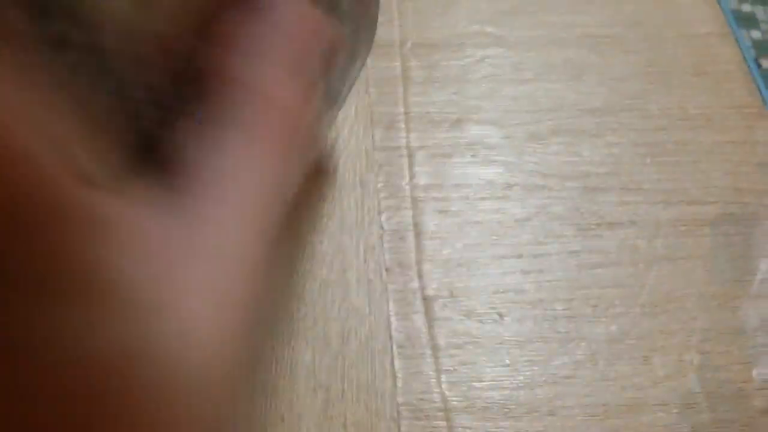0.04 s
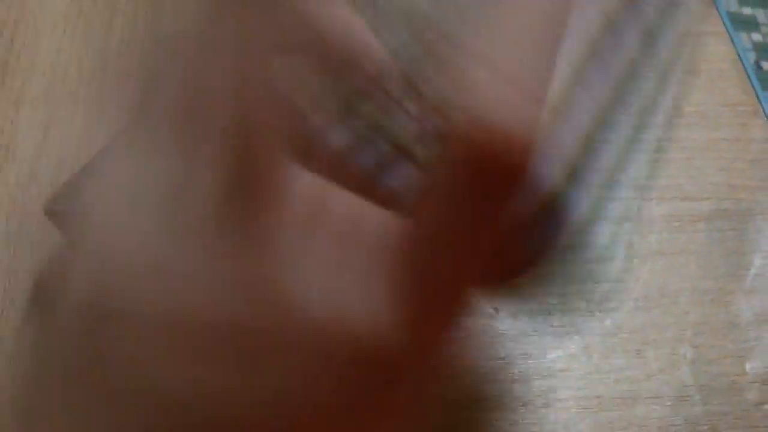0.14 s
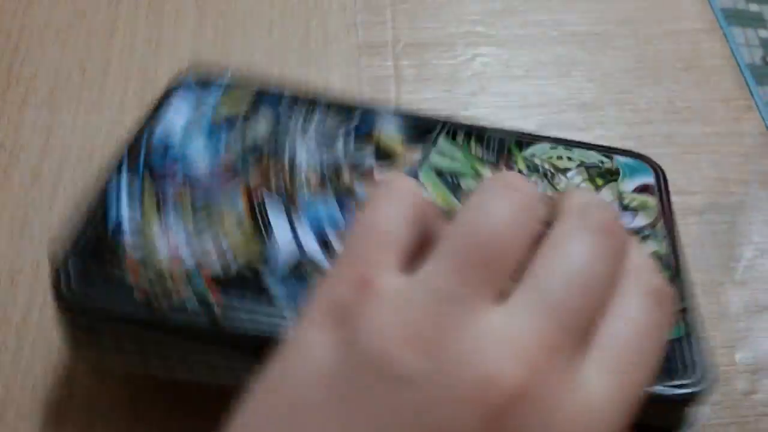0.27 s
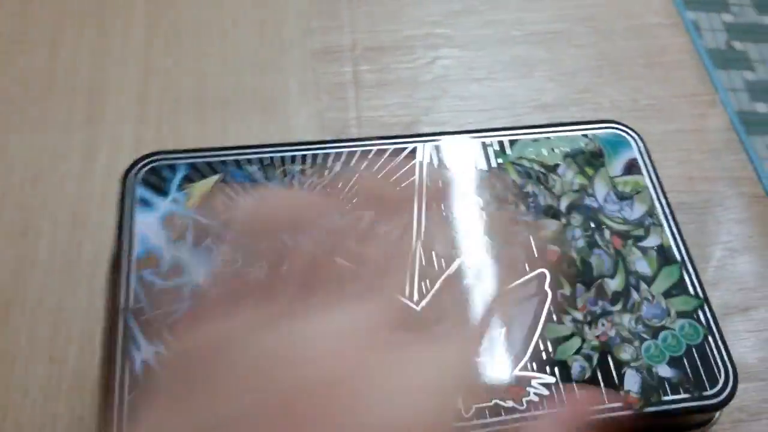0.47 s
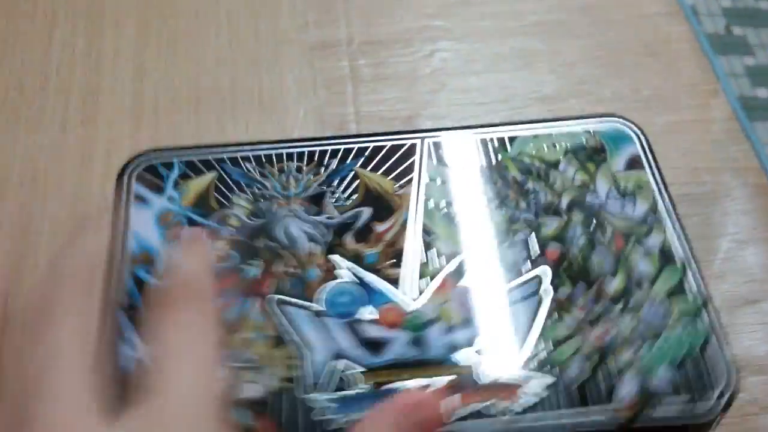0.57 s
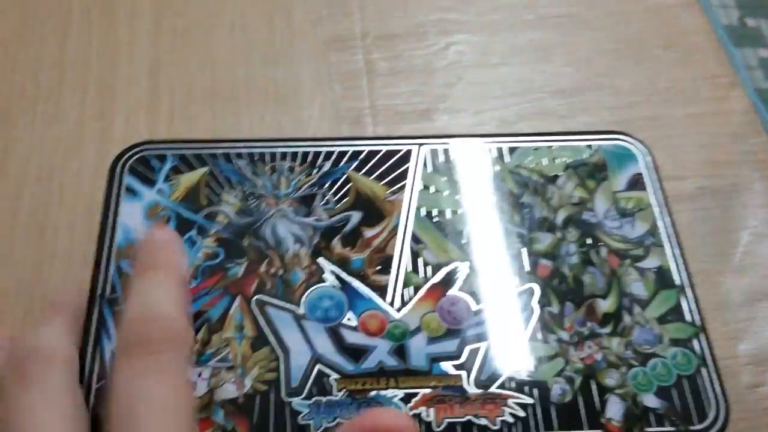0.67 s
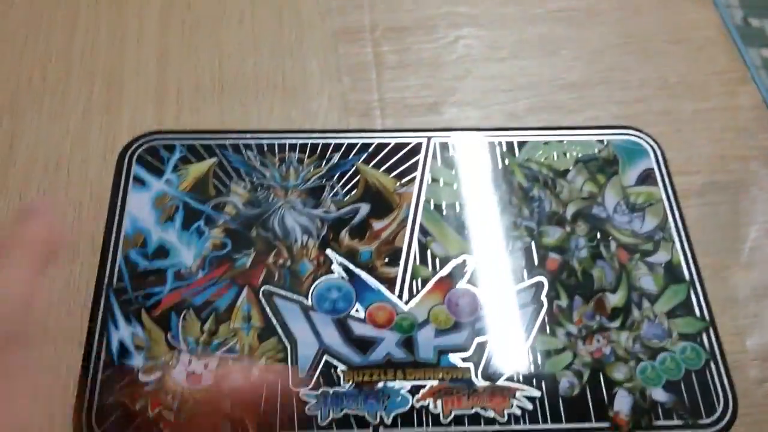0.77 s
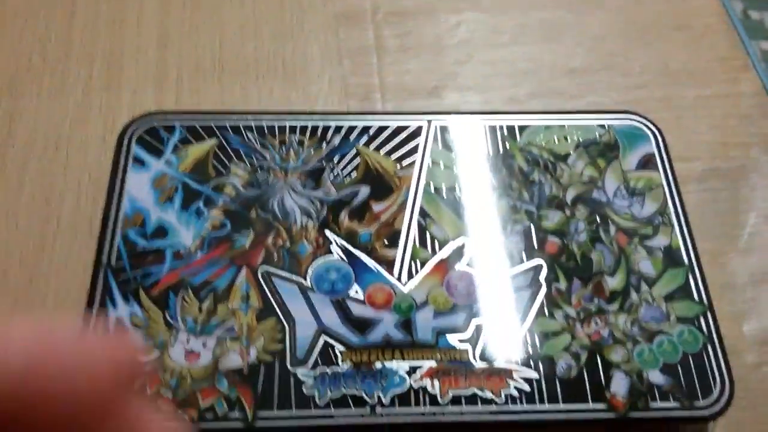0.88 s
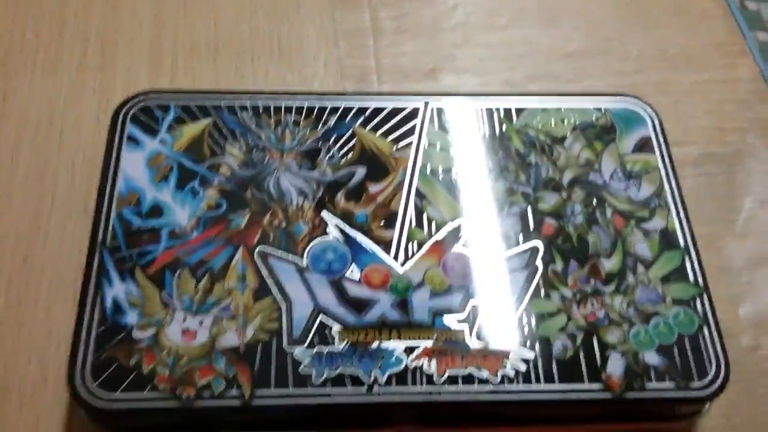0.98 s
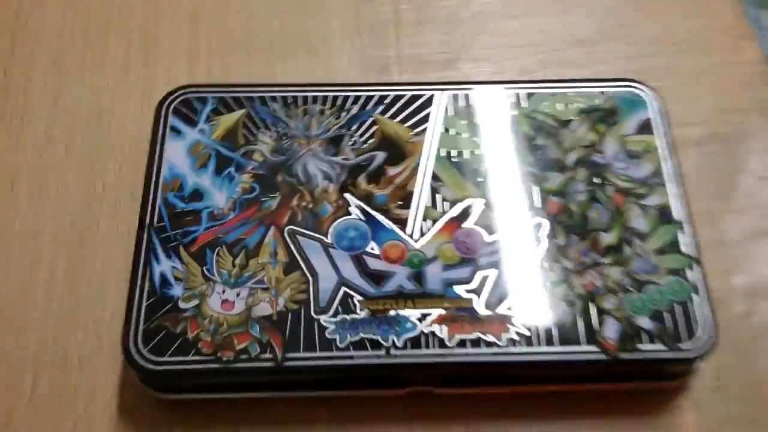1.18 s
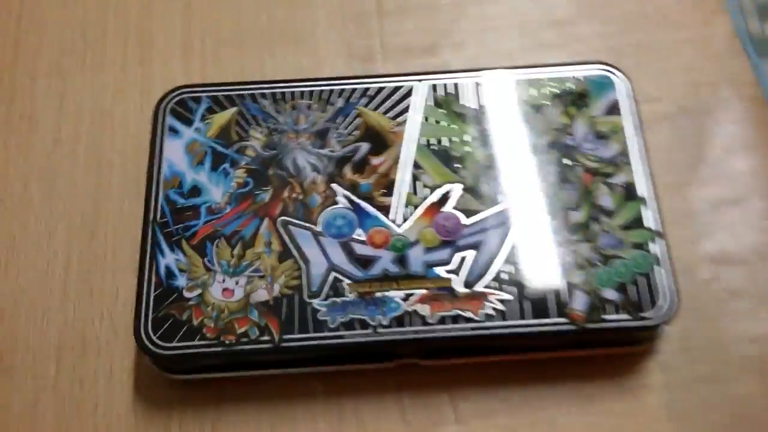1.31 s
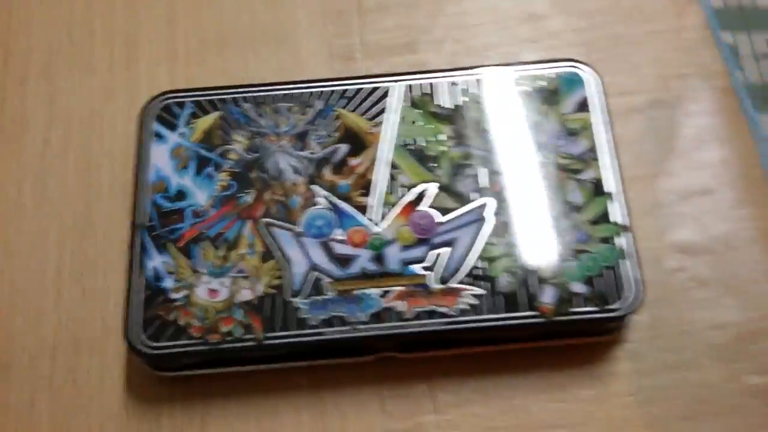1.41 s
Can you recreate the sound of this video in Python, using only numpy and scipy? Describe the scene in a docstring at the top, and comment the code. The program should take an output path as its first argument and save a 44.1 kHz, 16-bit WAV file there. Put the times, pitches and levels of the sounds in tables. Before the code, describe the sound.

A tin case is put down on a wooden table, close by in a small room. Two hollow knocks come at about 0.2 and 0.3 seconds, then two bright, clattering slaps at 0.4 and 0.5 seconds, the lid rattling and the metal ringing briefly. Fingers faintly brush the lid at 0.7 seconds. Soft, low handling bumps continue over quiet room noise until 1.45 seconds, with tiny ticks around 1.15.

```python
"""A tin case is put down on a wooden table, heard close by on one microphone in a small room.
Its corner and edge land with two hollow knocks, then it falls flat in two bright clattering slaps
as the lid rattles; each contact rings the panels, the sheet metal and, briefly, the microphone port.
Fingers brush off the lid; soft handling bumps and a few ticks sit over quiet room noise."""
import sys
import numpy as np
from scipy import signal
from scipy.fft import irfft
from scipy.io import wavfile

SR = 44100
rng = np.random.default_rng(int(sys.argv[2]) if len(sys.argv) > 2 else 0)


def to_wav(s):
    """Save 16-bit WAV."""
    ch = np.atleast_2d(s).T  # columns
    pcm = np.round(np.clip(ch, -1, 1) * 32767)  # PCM
    wavfile.write(sys.argv[1], SR, pcm.astype(np.int16))


N = 63945


def amp(db):
    """Decibels to gain."""
    return 10 ** (np.asarray(db) / 20)


def curve_at(points, hz):
    """Reads a curve on a log-frequency axis."""
    points_hz, values = np.transpose(points)
    return np.interp(np.log(hz + 1), np.log(points_hz + 1), values)


def add(mix, start_s, sound):
    """Mixes a sound in at its start time."""
    part = mix[round(start_s * SR):][:len(sound)]
    part += sound[:len(part)]


def noise(colour, size):
    """Noise of rms 1 with a given spectral shape."""
    hz = np.fft.rfftfreq(size, 1 / SR)
    phases = np.exp(2j * np.pi * rng.random(len(hz)))
    x = irfft(amp(curve_at(colour, hz)) * phases, size)
    return x / np.std(x)


def tint(x, colour, size=4096):
    """Minimum-phase filter with a given gain curve."""
    hz = abs(np.fft.fftfreq(size, 1 / SR))
    log_gain = np.log(amp(curve_at(colour, hz)))
    response = np.exp(np.conj(signal.hilbert(log_gain)))
    taps = np.fft.ifft(response).real[:size // 2]
    return signal.fftconvolve(x, taps)[:len(x)]


def swell(u):
    """Rises to 1 at u = 1, then dies away."""
    return u * np.exp(1 - u)


# Spectrum of the room tone: frequency_hz, relative_db
ROOM_TONE_COLOUR = [(20, -33.5), (32, -20.5), (48, -0.5), (72, 9), (110, -10), (180, -11), (330, -11),
                    (600, -17), (1200, -21.5), (2200, -29.5), (4000, -39.5), (5200, -38.5), (6100, -31),
                    (7500, -47), (15500, -44.5)]
# Its level at the microphone: time_s, level_db
ROOM_TONE_LEVELS = [(0, -45), (0.199, -50.5), (0.701, -47.5), (0.899, -54.5), (1.45, -53.5)]
def room_tone():
    """Quiet rumble and hiss of the room, drifting in level."""
    level_db = np.interp(np.arange(N) / SR, *np.transpose(ROOM_TONE_LEVELS))
    return amp(level_db) * noise(ROOM_TONE_COLOUR, N)


# Soft handling of the microphone: peak_s, level_db, pitch_hz, width_s
BUMPS = [(.01, -48, 70, 0.0048), (0.195, -42, 80, 0.0055), (.213, -29.5, 126, 0.0092),
         (0.245, -28, 76, 0.0087), (0.31, -32.5, 72, .012), (0.365, -22, 91, 0.0023),
         (.415, -39, 56.5, 0.032), (0.55, -39.5, 71, 0.033), (0.613, -24.5, 112, 0.0058),
         (0.682, -33.5, 127, 0.004), (0.734, -34, 80, 0.0054), (0.817, -43.5, 127.5, 0.012),
         (0.869, -36.5, 94.2, 0.0065), (.964, -38, 150.3, .0035), (1.017, -38, 110, 0.0065),
         (1.138, -42.5, 130.6, 0.0083), (1.154, -39.5, 84.9, 0.011), (1.1783, -25, 167.6, 0.0018),
         (1.185, -33, 110, .008), (1.24, -36, 203, 0.0033), (1.252, -39, 150.8, 0.0067),
         (1.283, -36.5, 129, 0.0044), (1.315, -39.5, 85, 0.024), (1.354, -39.5, 99.9, 0.0092),
         (1.432, -30, 120, 0.0028), (1.445, -38.5, 85, 0.011)]
def handling_bump(peak_s, level_db, pitch_hz, width_s):
    """Handling gives a dull, low push that swells and dies away."""
    t = np.arange(N) / SR - peak_s
    envelope = np.exp(1 - np.hypot(1, 2 * t / width_s))
    return amp(level_db) * envelope * np.cos(2 * np.pi * pitch_hz * t)


# Spectrum of the clatter's crowded, short-lived resonances: frequency_hz, relative_db
TIN_COLOUR = [(40, -27), (100, -9), (190, -10.5), (340, 0.5), (600, -4), (750, -6), (1150, -0.5),
              (1650, -8.5), (2250, -6.5), (3000, -14), (4500, -19), (5500, -11.5), (6250, -9.5),
              (6900, -17.5), (8500, -26), (15500, -32)]
def tin_strike(t, contact_db, contact_hz):
    """Each contact gives a push and a crack, and sets off a brief shrill ring in the microphone port."""
    push_rise_cycles, mic_ring_hz, mic_ring_rise_s = 0.45, 6080, 0.0008
    crack_t60_s, sheet_t60_s, sheet_rise_s = 0.0045, 0.057, 0.0012
    push = -amp(-6) * swell(t * contact_hz / push_rise_cycles) * np.sin(2 * np.pi * contact_hz * t)
    mic_ring = amp(-18) * swell(t / mic_ring_rise_s) * np.sin(2 * np.pi * mic_ring_hz * t)
    crack = amp(-13 - 60 * t / crack_t60_s) * noise(TIN_COLOUR, len(t))
    sheet_envelope = amp(-4.5 - 60 * t / sheet_t60_s) * (1 - np.exp(-t / sheet_rise_s))
    sheet = sheet_envelope * noise(TIN_COLOUR, len(t))  # the thin metal rings on after the crack
    return amp(contact_db) * (push + mic_ring + crack) + sheet


# Parts of the case that land, in the order of the level columns below
SPOTS = ["corner", "edge", "rim", "face"]
# Panel modes of the case: pitch_hz, t60_s, corner_db, edge_db, rim_db, face_db
PANEL_MODES = [(233.3, 0.23, -22, -22.5, -13, -12.5), (307.6, 0.16, -24, -15.5, -16, -8.5),
               (353.6, .13, -27.5, -12.5, -4, -8.5), (401, 0.057, 1, -10, -7, -13.5),
               (469.3, 0.14, -19.5, -1, -5.5, -8), (493.4, 0.15, 1, -10, -9.5, -4.5),
               (548, 0.095, -26.5, -21, -13, -5), (639, 0.18, -25, -24, -15, -8),
               (694.4, .25, -25, -16, -15, -17.5), (877.4, .2, -17, -15, -11.5, -22),
               (941, 0.32, -22.5, -23, -10.5, -21), (1051, 0.3, -24, -18, -18.5, -9.5),
               (1168, .1, -23, -26.5, -10, -9.5), (1228, 0.1, -15, -5, -13.5, -11.5),
               (1280, 0.31, -28.5, -27, -14, -18.5), (1449, .25, -30.5, -27, -17, -24),
               (1663, .17, -31.5, -28.5, -22, -17.5), (1914, 0.26, -34.5, -27.5, -6, -24.5),
               (2175, 0.072, -19.5, -18.5, -23.5, -3.5), (2510, .17, -21.5, -23.5, -24, -19.5),
               (6030, 0.33, -32.5, -26.5, -20.5, -24)]
def panel_ring(t, spot, rise_s=0.0027):
    """The panels ring in decaying modes; the spot that lands sets how strongly each one sounds."""
    ring = np.zeros(len(t))
    for k, (pitch_hz, t60_s, *spot_db) in enumerate(PANEL_MODES):
        envelope = amp(spot_db[SPOTS.index(spot)] - 60 * t / t60_s)
        ring += (-1) ** k * envelope * np.sin(2 * np.pi * pitch_hz * t)
    return ring * (1 - np.exp(-t / rise_s))


# Decay of the small room: frequency_hz, t60_s
ROOM_DECAY = [(100, 0.58), (400, 0.3946), (1200, 0.22), (3000, 0.2991), (6200, 0.2767), (14000, 0.302)]
# Colour of its reflections at the microphone: frequency_hz, gain_db
ROOM_COLOUR = [(100, -1.3), (400, -0.91), (1200, -1), (3000, 0), (6200, 0), (14000, 0.91)]
def room_tail(t, rise_s=0.025):
    """The room scatters the clatter, each band dying at its own speed."""
    hz, frame_s, bands = signal.stft(noise(TIN_COLOUR, len(t)), SR, nperseg=512)
    decay_db = 60 * frame_s / curve_at(ROOM_DECAY, hz)[:, None]
    bands = bands * amp(curve_at(ROOM_COLOUR, hz)[:, None] - decay_db)
    tail = signal.istft(bands, SR)[1][:len(t)]
    return amp(-12) * (1 - np.exp(-t / rise_s)) * tail


# Bands of a knock (thud, two held flat, clang, clank, shrill, sizzle): frequency_hz
KNOCK_BANDS_HZ = [100, 300, 560, 1150, 2300, 5800, 10000]
# The case landing on the table, near the microphone: start_s, spot, level_db, contact_db, contact_hz,
# thud_db, clang_db, clank_db, shrill_db, sizzle_db, panels_db, room_db (all levels are relative)
KNOCKS = [(.2051, "corner", -16, 2, 560, 5, -2, -5.5, -8, -12.5, 10, -2),
          (.2786, "edge", -9.5, -1.5, 889, -10.5, -5.5, 0, -16.5, -12.5, 10.5, -5.5),
          (0.2801, "edge", -9, 10, 403, -7, -14.5, -6.5, -10, -5, -14, -3),
          (0.3572, "rim", -13, 12.5, 1025, 7, 8.5, 10.5, 9.5, 11, 3.5, 2),
          (0.3594, "rim", -24, 15.5, 480, 3.5, -1.5, -2, 17.5, 14.5, -5.5, 2),
          (.3695, "rim", -22, -8.5, 795, -6, -2.5, 2, 12, 3, 1.5, 10.5),
          (0.3828, "face", -11, 10, 386.2, -11.5, 1, -0.5, -0.5, 0.5, -13, 2),
          (.3905, "face", -20, 10, 1010, -7, 4.5, -7.5, -3, -2, -11.5, -2),
          (0.5025, "face", -7, 6.5, 745, -8.5, 3.5, 2.5, -2, -4, 1.5, -1),
          (0.5067, "face", -9.5, 2, 522, -6, 3, 5.5, 8, 1.5, -1, -4)]
def knock(spot, level_db, contact_db, contact_hz,
          thud_db, clang_db, clank_db, shrill_db, sizzle_db, panels_db, room_db):
    """One contact sets off the sheet metal, the panels and the room, with a colour of its own."""
    t = np.arange(SR * 3 // 4) / SR
    strike = tin_strike(t, contact_db, contact_hz)
    panels = amp(panels_db - 11) * panel_ring(t, spot)
    reflections = amp(room_db) * room_tail(t)
    colour = list(zip(KNOCK_BANDS_HZ, [thud_db, 0, 0, clang_db, clank_db, shrill_db, sizzle_db]))
    return amp(level_db) * tint(strike + panels + reflections, colour)


# Spectrum of skin sliding on tin: frequency_hz, relative_db
RUB_COLOUR = [(100, 3.5), (300, -6.5), (360, 2), (410, -6.5), (490, 6.5), (620, -19), (720, 6), (810, -16),
              (1120, -4.5), (1600, -17.5), (2500, -16), (4000, -38), (6200, -21), (8000, -37), (15000, -46)]
# Tones of the lid under the fingers: pitch_hz, relative_db
LID_TONES = [(362, 3), (722, -2.5)]
# Fingers leaving the case on the table: start_s, length_s, level_db
RUBS = [(0.699, 0.033, -43), (0.719, 0.041, -44.5)]
def finger_rub(length_s, level_db):
    """Skin slides over the hollow case; the friction eases as the lid's hum grows."""
    t = np.arange(0, length_s, 1 / SR)
    progress = t / length_s
    hum = sum(amp(db) * np.sin(2 * np.pi * (hz * t + rng.random())) for hz, db in LID_TONES)
    friction = noise(RUB_COLOUR, N)[:len(t)]
    envelope = np.sqrt(abs(np.sin(np.pi * progress)))
    return amp(level_db) * envelope * (friction * (1 - progress / 2) + hum * progress)


# Spectrum of a tick: frequency_hz, relative_db
TICK_COLOUR = [(300, 16), (1200, -9), (2200, 0), (4000, -8.5), (5900, 8.5), (7500, -12), (10000, -12),
               (15000, -27)]
# Ticks, faint at the microphone: start_s, level_db, t60_s
TICKS = [(.731, -48, .012), (1.1265, -55, .008), (1.1311, -40.5, 0.0066), (1.166, -54, 0.0095),
         (1.170, -50.5, 0.011), (1.192, -66, .12)]
def tick(level_db, t60_s):
    """A tiny dry click or scuff: a burst of noise that dies quickly."""
    t = np.arange(SR // 10) / SR
    return amp(level_db - 60 * t / t60_s) * noise(TICK_COLOUR, len(t))


def scene():
    """The case, the hand and the room at one microphone."""
    mix = room_tone() + sum(handling_bump(*row) for row in BUMPS)
    for source, events in ((knock, KNOCKS), (finger_rub, RUBS), (tick, TICKS)):
        for start_s, *settings in events:
            add(mix, start_s, source(*settings))
    return mix[None]


def record(dry):
    """The microphone channel overloads softly on the loudest peaks, then trims lows and top treble."""
    ceiling, low_cut_hz, high_cut_hz = 1.1, 42, 15950
    squeezed = dry / (1 + (dry / ceiling) ** 4) ** (1 / 4)
    low_cut = signal.butter(2, low_cut_hz, "high", fs=SR, output="sos")
    high_cut = signal.firwin(401, high_cut_hz, window=("kaiser", 9), fs=SR)
    return signal.oaconvolve(signal.sosfilt(low_cut, squeezed), high_cut[None], "same")


dry = scene()
out = record(dry)
to_wav(out)
```